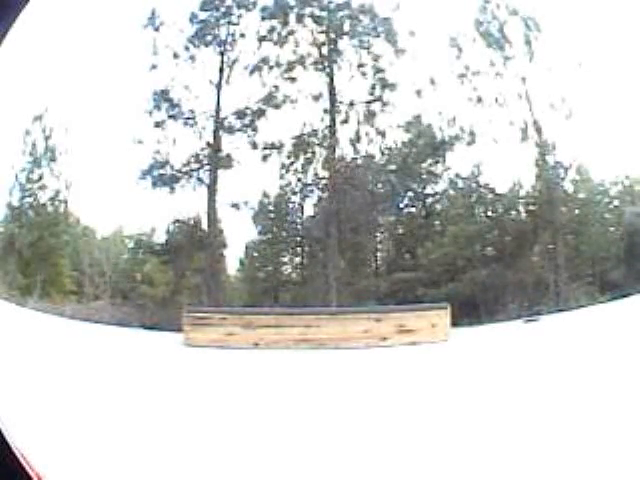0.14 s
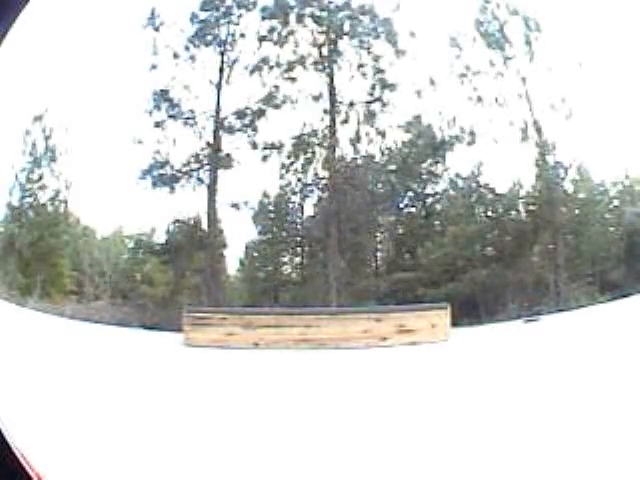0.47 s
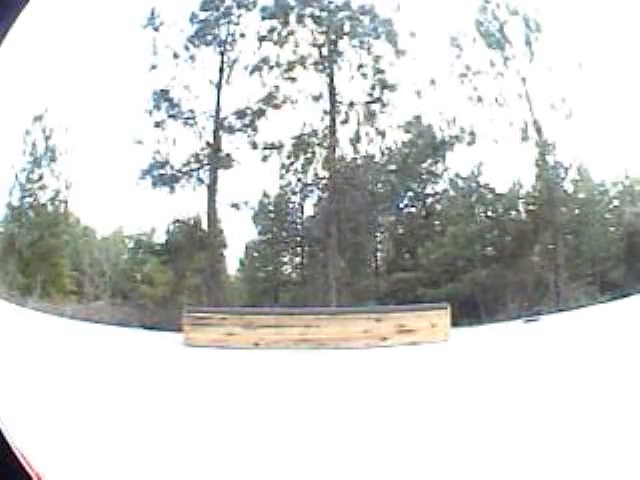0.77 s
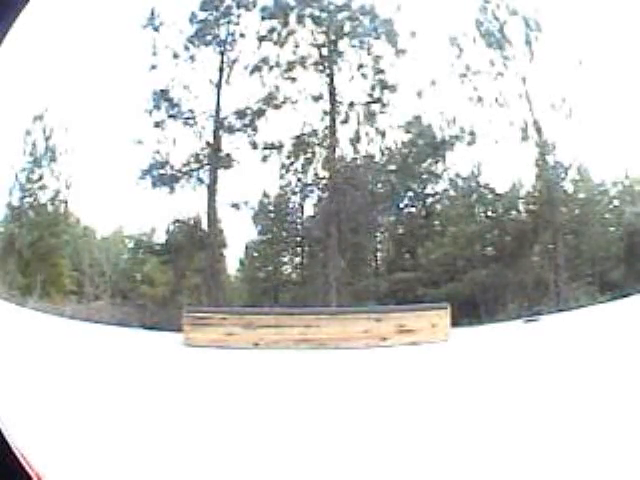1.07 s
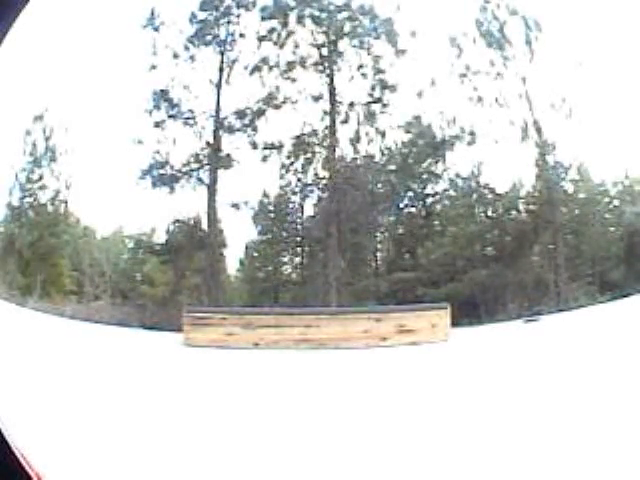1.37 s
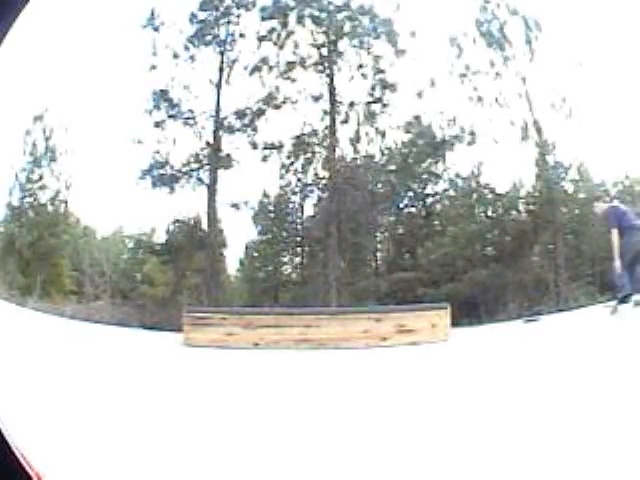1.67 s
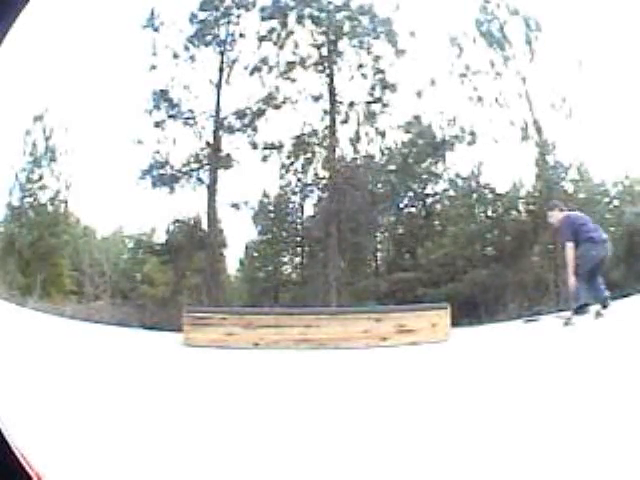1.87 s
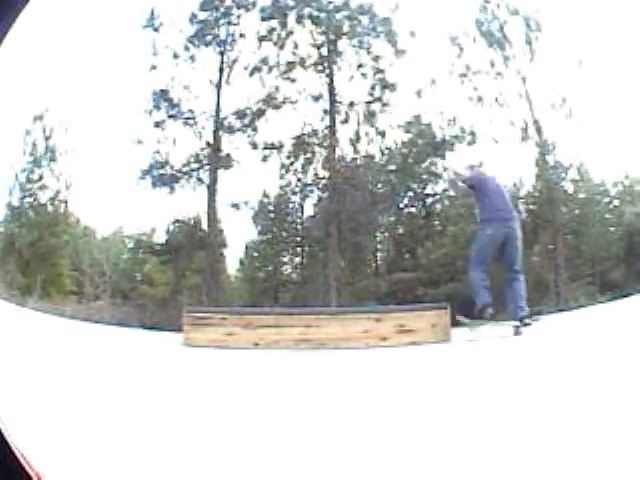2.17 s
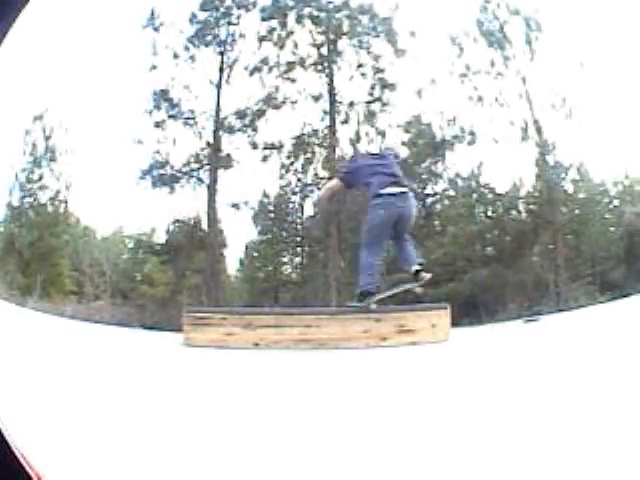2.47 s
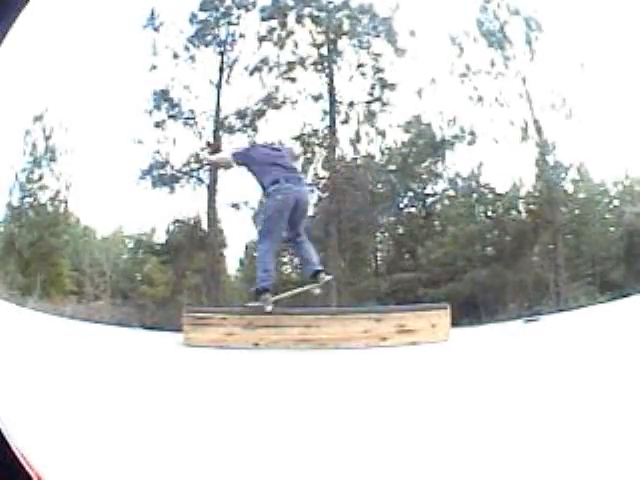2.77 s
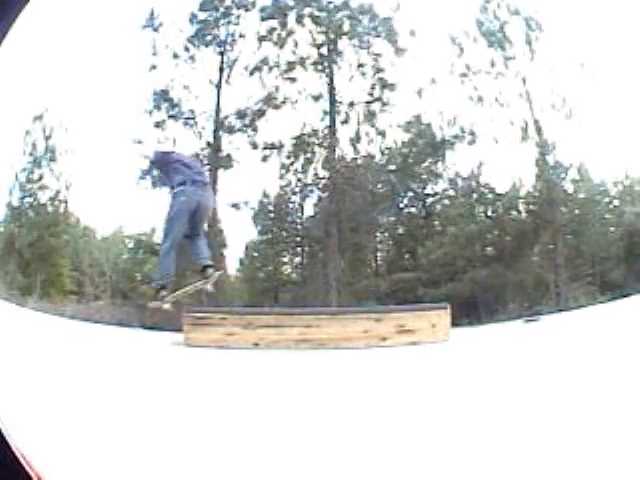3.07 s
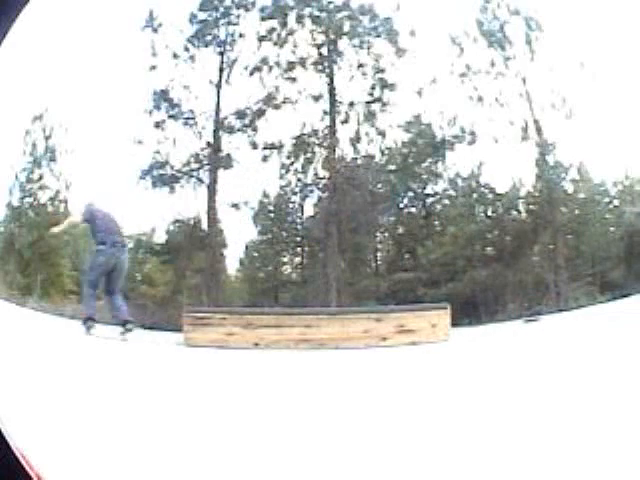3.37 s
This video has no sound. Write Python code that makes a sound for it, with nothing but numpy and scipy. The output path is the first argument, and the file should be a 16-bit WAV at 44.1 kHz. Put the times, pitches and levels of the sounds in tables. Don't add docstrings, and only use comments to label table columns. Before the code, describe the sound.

Skateboard wheels rumble over concrete, tail cracks, axle scrapes a wooden box, board slaps down outdoors

```python
import sys
import numpy as np
from scipy import signal
from scipy.io import wavfile

SR = 44100
rng = np.random.default_rng(int(sys.argv[2]) if len(sys.argv) > 2 else 0)


def materialize(psi):
    bounded = np.clip(np.atleast_2d(psi).T, -1, 1)
    quanta = np.round(bounded * 32767).astype(np.int16)
    wavfile.write(sys.argv[1], SR, quanta)


def gain_from_decibels(decibels):
    exponent = np.asarray(decibels, float) / 20
    return 10 ** exponent


N = 155232


def rms_one(x):
    return x / np.sqrt(np.mean(x ** 2) + 1e-20)


def in_time(rows):
    s, *columns = np.transpose(rows)
    return [np.interp(np.arange(N) / SR, s, c) for c in columns]


def at_hz(points, hz):
    known_hz, db = np.transpose(points)
    return np.interp(np.log(hz), np.log(known_hz), db)


def drift(rate):
    r = np.exp(-80 * np.pi * rate / SR)
    noise = rng.standard_normal(N // 40 + 2002)
    slow = signal.lfilter([1], [1, -2 * r, r * r], noise)[2000:]
    return np.interp(np.arange(N) / 40, np.arange(len(slow)), rms_one(slow))


def cut(x, hz, kind, order=2):
    return signal.sosfilt(signal.butter(order, hz, kind, fs=SR, output="sos"), x)


def body(x, peaks):
    out = 0
    for k, (hz, width_hz, db) in enumerate(peaks):
        r = np.exp(-np.pi * width_hz / SR)
        poles = [1, -2 * r * np.cos(2 * np.pi * hz / SR), r * r]
        gain = (-1) ** k * gain_from_decibels(db) * np.sqrt(1 - r * r) / 2
        out = out + gain * signal.lfilter([1, 0, -1], poles, x)
    return out


def grains(per_s, spread_db):
    sizes = gain_from_decibels(spread_db * np.minimum(rng.exponential(1, N), 5)) * rng.choice([-1, 1], N)
    return rms_one(sizes * (rng.random(N) < per_s / SR) + 1e-9)


def burst(s, length, rise):
    out, i = np.zeros(N + SR), int(s * SR)
    t = np.arange(SR // 4) / SR
    out[i:i + len(t)] = (1 - np.exp(-t / max(rise, 1e-4))) ** 2 * np.exp(-t / max(length, 5e-4))
    return out[:N]


def near_tones(rows):
    t, rough, waver = np.arange(N) / SR, 1 + 0.25 * drift(150), 0.88 * drift(60)
    out = np.zeros(N)
    for s, length, hz, db in rows:
        swell = gain_from_decibels(db) * np.exp(-((t - s) / length) ** 2 * 2) * rough
        out += swell * np.cos(2 * np.pi * hz * (t - s) + min(hz / 1000, 1) * waver)
    return out


# (frequency [Hz], likeness [0-1])
SIDE_LIKENESS = [(60, 1), (160, 1), (420, 0.88), (1110, 0.37), (2940, 0.22), (7790, 0.19)]


def coloured(source, spectrum, patchy_db):
    out, edges = 0, 24 * 2 ** np.arange(0, 8.6, .5)
    for low, high in zip(edges, edges[1:]):
        mid, side = cut(source, [low, high], "band")
        hz = np.sqrt(low * high)
        alike = np.clip(at_hz(SIDE_LIKENESS, hz), 0, .999)
        pair = np.sqrt(1 + alike) * mid + np.sqrt(1 - alike) * side * [[1], [-1]]
        out = out + gain_from_decibels(at_hz(spectrum, hz) + patchy_db * drift(12.9)) * pair
    return rms_one(out)


# (time [s], level [dB], rider's crouch [0-1], grit hiss [dB])
ROLL = [(0, -28.5, 0.27, -82), (.85, -24, 0.31, -54), (1.1, -24.5, 0.39, -53.5), (1.52, -22, 0.3, -45.5),
        (1.82, -24, 0.45, -46.5), (1.9, -26.5, 0.79, -46.5), (2.12, -21, 0.63, -44), (2.23, -20, 0.62, -43),
        (2.3, -28, 0.56, -52), (2.34, -32.5, 0.88, -68), (3.385, -42, 0.2, -46.5), (3.41, -25, 0.45, -49),
        (3.45, -25, 0.58, -58), (3.52, -24, 0.41, -60.5)]
# (time [s], depth [dB])
THROB = [(1.0, 0), (1.25, 2.5), (1.7, 2), (2.05, 1.5), (2.15, 1)]
# (frequency [Hz], level [dB per Hz])
ROAD = [(45, -10), (130, -9.5), (300, -3.5), (600, 2.5), (1500, -15.5), (2600, -42.5), (4500, -66),
        (8000, -34)]
# (frequency [Hz], width [Hz], level [dB])
DECK_UPRIGHT = [(141.5, 19.8, -2.5), (234.2, 97, 2), (384.4, 43, 0), (540.6, 66, -1.5), (1150, 310, -6),
                (1793, 90, -16.5)]
# (frequency [Hz], width [Hz], level [dB])
DECK_CROUCHED = [(212.4, 58, 2), (442, 13, -22), (530, 27, -3.5), (798, 32, -6.5), (946, 185, -10),
                 (1350, 1000, -19.5)]


def wheels():
    turns_per_s, flat_spot_s, grit_per_s = 22.9, 1.334, 7000
    level_db, crouch, grit_db = in_time(ROLL)
    crouch = np.clip(crouch, 0, 1)
    since_flat_spot = np.arange(N) / SR - flat_spot_s
    turn = np.cos(2 * np.pi * turns_per_s * since_flat_spot + .1 * drift(1.5))
    throb_db = in_time(THROB)[0] * turn
    grit = np.array([grains(grit_per_s, 2.75), grains(grit_per_s, 3.0)])
    upright = (1 - crouch) * gain_from_decibels(1.5) * body(grit[0], DECK_UPRIGHT)
    crouched = crouch * gain_from_decibels(4.0) * body(grit[0], DECK_CROUCHED)
    rumble = gain_from_decibels(-10.5) * coloured(grit, ROAD, patchy_db=1.48)
    hiss = cut(rng.standard_normal((2, N)) * 0.14 + rng.standard_normal(N), 5940, "high")
    rolling = gain_from_decibels(level_db + throb_db) * (upright + crouched + rumble)
    return rolling + gain_from_decibels(grit_db + 0.54 * throb_db + 7.5) * hiss


# (frequency [Hz], level [dB per Hz])
HUSH = [(40, -19), (300, 2), (850, 0), (1400, -6), (2500, -22.5), (8000, -30.5)]
# (time [s], level [dB])
GUSTS = [(0, -27), (.6, -28.5), (1.0, -27), (1.15, -34), (1.6, -29), (2.55, -31.5), (2.61, -18.5),
         (2.75, -35.5), (3.3, -27.5), (3.52, -49.5)]


def air():
    hush_db, wind_db, wind_hz, wind_width_hz = -31, -4, 66, 18
    gust_db = in_time(GUSTS)[0]
    flow = rng.standard_normal(N) + 0.31 * rng.standard_normal((2, N))
    wind = gain_from_decibels(gust_db + wind_db) * rms_one(body(flow, [(wind_hz, wind_width_hz, 0)]))
    buffet = gain_from_decibels(-3.5 + 0.6 * gust_db) * cut(rng.standard_normal((2, N)), 49, "low")
    return gain_from_decibels(hush_db) * coloured(rng.standard_normal((2, N)), HUSH, patchy_db=0.9) + wind + buffet


# (time [s], knock [dB], thud [dB], crack [dB], chatter length [s])
BLOWS = [(0.889, -15.5, -12, -32, 0.0047), (1.007, -14, -19.5, -31, 0.0022),
         (1.015, -17.5, -29, -50, 0.0035), (1.3872, -15, -29.5, -35, 0.0019),
         (2.5203, -4, -17.5, -13, 0.0018), (2.529, -13, -20, -22, 0.0074),
         (2.556, -16.5, -22, -25.5, 0.018), (2.729, -24, -22.5, -47, 0.0072), (2.844, -33, -17, -38, 0.008),
         (3.3686, -12, -26, -19.5, 0.0013), (3.377, -23, -26, -36, .003),
         (3.472, -20.5, -25.5, -54, 0.0036)]
# (frequency [Hz], width [Hz], level [dB])
BOX = [(57.6, 7, -22), (118.4, 75, -4), (168, 44, -1), (238.4, 34, 1), (304, 25, -2.5), (430, 22, -1.5),
       (550, 90, -3.5)]
# (frequency [Hz], width [Hz], level [dB])
AXLE = [(780, 80, -5), (848, 12, -5), (1055, 243, 0.5), (1220, 40, -4.5), (1376, 55, -2.5),
        (1710, 430, -1.5), (1890, 180, -2.5), (2230, 780, -10), (3360, 68, -21.5), (3760, 110, -25),
        (4970, 1400, -22.5), (7450, 1700, -19)]


def blows():
    thud_hz, thud_ring_s = 210, 0.014
    force = np.zeros((3, N))
    for s, knock_db, thud_db, crack_db, length in BLOWS:
        force[0] += gain_from_decibels(knock_db + 16) * burst(s, 0.71 * length, length)
        force[1] += gain_from_decibels(thud_db + 2) * burst(s, length + thud_ring_s, length)
        force[2] += gain_from_decibels(crack_db + 12.5) * burst(s, .5 * length, length)
    hit, push, snap = force * rng.standard_normal((3, N)) + 1e-12
    knock = gain_from_decibels(10.5) * cut(hit, (380, 1760), "band", order=3) + gain_from_decibels(-4.0) * body(hit, AXLE)
    thud = gain_from_decibels(20) * cut(cut(push, 2.5 * thud_hz, "low"), .3 * thud_hz, "high")
    thud = thud + gain_from_decibels(-7) * body(push, BOX)
    crack = gain_from_decibels(19) * cut(cut(snap, 2960, "high"), 3900, "low", order=1)
    return knock + thud + crack


# (time [s], level [dB], ring [Hz], chatter
# length [s])
CATCHES = [(0.8945, -1.5, 600, 0.004), (0.897, -16.5, 3510, 0.0027), (1.009, -14.5, 3020, 0.0019),
           (1.008, -5, 1660, 0.0023), (1.013, 4, 620, .002), (1.02, -1.5, 519, 0.0028),
           (1.388, -11, 397, .003), (1.518, -11.5, 380, .008), (2.341, 2.5, 800, .0012),
           (2.348, -7.5, 1590, 0.0027), (2.522, -6.5, 559, 0.0085), (2.601, -17, 1500, 0.0027),
           (2.686, -12, 2420, 0.0029), (2.686, -6, 800, 0.004), (2.789, -6.5, 1150, 0.0037),
           (2.843, -11, 1150, 0.003), (2.864, -9, 1234, 0.004), (2.879, -15, 1245, 0.004),
           (2.913, -19, 1240, .003), (2.944, -5.5, 1254, 0.0039), (2.963, -11.5, 520, .005),
           (2.951, -17.5, 1220, 0.025), (3.0, -11.5, 300, 0.0066), (3.006, -13, 1320, .004),
           (3.032, -1.5, 1350, 0.003), (3.037, -2.5, 1250, 0.0029), (3.032, -18.5, 3400, 0.004),
           (3.083, -12, 842, 0.014), (3.092, -10.5, 838, 0.014), (3.142, -8.5, 1050, 0.0057),
           (3.188, -20, 790, .004), (3.3606, -7, 1106, 0.0028), (3.369, 1.5, 805, 0.002),
           (3.371, 1, 1230, 0.0024), (3.376, -9.5, 603, .003), (3.383, -9.5, 744, .003),
           (3.405, -16, 1440, .003), (3.441, -16, 1430, .003)]


def catches():
    t, white, waver = np.arange(N) / SR, rng.choice([-1., 1.], N), .9 * drift(120)
    splash = gain_from_decibels(-3) * cut(white, 2800, "low", order=4)
    out = np.zeros(N)
    for s, db, hz, length in CATCHES:
        ring = np.sin(2 * np.pi * hz * (t - s) + waver)
        out += gain_from_decibels(db) * burst(s, length, .0007) * (ring + min(hz / 1500, 1) * splash)
    return out


# (middle time [s], length [s], frequency [Hz], level [dB])
BOOMS = [(0.918, .012, 210, -17), (0.945, 0.024, 125, -17), (1.42, 0.011, 390, -23),
         (1.553, 0.017, 387, -18), (1.595, 0.0087, 300, -21), (2.552, .024, 318.5, -11.5),
         (2.568, .018, 139.5, -12.5), (2.594, .013, 95, -15), (2.589, .045, 428.5, -19),
         (2.62, .015, 85, -23), (2.646, .013, 75, -23), (2.679, .018, 62, -17.5), (2.835, .03, 238, -19.5),
         (3.445, .015, 85, -25), (3.087, 0.0069, 200, -14), (3.11, .013, 204, -14.5),
         (3.13, 0.0092, 190, -16), (3.154, 0.012, 185, -17), (3.25, 0.033, 166, -28.5),
         (3.3673, .004, 170, -9.5)]


def booms():
    return near_tones(BOOMS)


# (time [s], level [dB])
SHOE = [(2.3, -66.5), (2.33, -21), (2.352, -14.5), (2.375, -23.5), (2.392, -18), (2.41, -27), (2.44, -27.5),
        (2.47, -34), (2.5, -45), (3.395, -60), (3.42, -19.5), (3.45, -33), (3.5, -36)]


def shoe():
    drag = gain_from_decibels(in_time(SHOE)[0]) * grains(8500, 1.2)
    return body(drag, [(1500, 530, 1.5)]) + gain_from_decibels(-9) * cut(drag, 3500, "high")


# (time [s], level [dB], decay [s])
SLAPS = [
    (2.3411, -2.5, 0.0009),
    (3.3688, -14, 0.0011),
]
# (frequency [Hz], width [Hz], level [dB])
SLAP_BANDS = [(1400, 330, 2), (2220, 1300, 1.2), (5200, 2600, 1.8)]


def pop():
    slap = sum(gain_from_decibels(db) * burst(s, decay, 0.000067) for s, db, decay in SLAPS)
    return body(slap * rng.choice([-1, 1], N) + 1e-12, SLAP_BANDS)


# (time [s], level [dB], weight on the box [dB])
GRIND = [(2.52, -45.5, -6.5), (2.535, -19.5, 0), (2.585, -25, 2.5), (2.63, -22, 2.5), (2.675, -24, 4.5),
         (2.72, -20.5, 2), (2.78, -22.5, 2.5), (2.845, -17, 0), (2.87, -27.5, -8), (2.94, -25, 8),
         (3.02, -18, -1), (3.07, -17.5, 7), (3.11, -15.5, 3.5), (3.155, -17, 6), (3.21, -34.5, 1),
         (3.25, -54.5, 15.5)]


def grind():
    scrapes_per_s, spread_db, judder_db = 2200, 1, 3.5
    level_db, weight_db = in_time(GRIND)
    slips = gain_from_decibels(level_db + judder_db * drift(52)) * grains(scrapes_per_s, spread_db)
    return body(slips, AXLE) * gain_from_decibels(-5.5) + body(slips * gain_from_decibels(weight_db), BOX) * gain_from_decibels(-9)


# (middle time [s], length [s], frequency [Hz], level [dB])
SQUEALS = [(2.54, .008, 3750, -33), (2.535, .025, 7200, -39), (2.84, .016, 3860, -33),
           (2.99, .03, 3900, -45), (3.092, .007, 3550, -26)]


def squeals():
    return near_tones(SQUEALS)


# (left delay [s], level [dB], right delay [s])
ECHOES = [
    (.009, -17.5, 0.021),
    (.024, -26, 0.038),
]


def echoes(x):
    out, dull = np.zeros((2, N)), cut(x, 2400, "low", order=1)
    for left_s, db, right_s in ECHOES:
        for side, s in enumerate((left_s, right_s)):
            delay = int(s * SR)
            out[side, delay:] += gain_from_decibels(db) * dull[:-delay]
    return out


# (time [s], left minus right [dB])
POSITION = [(0, -18), (2.3, -3.5), (3.3, -0.5), (3.36, 10.5), (3.42, 2)]


def scene():
    pan_db = in_time(POSITION)[0] / 2
    board = blows() + catches() + booms() + shoe() + pop() + grind() + squeals()
    near = wheels() + board + echoes(board)
    bass = cut(near, 980, "low", order=1)
    return bass + (near - bass) * gain_from_decibels(pan_db * [[1], [-1]]) + air()


def top_cut(x):
    return signal.sosfilt(signal.butter(12, 8390, fs=SR, output="sos"), x)


def record(dry):
    low_cut_hz, top_hz, overload = 69, 8450, 1
    narrow = signal.cheby2(14, 60, top_hz, fs=SR, output="sos")
    x = signal.sosfilt(narrow, cut(dry, low_cut_hz, "high"))
    return top_cut(np.clip(x, -overload, overload))


dry = scene()
out = record(dry)
materialize(out)
```